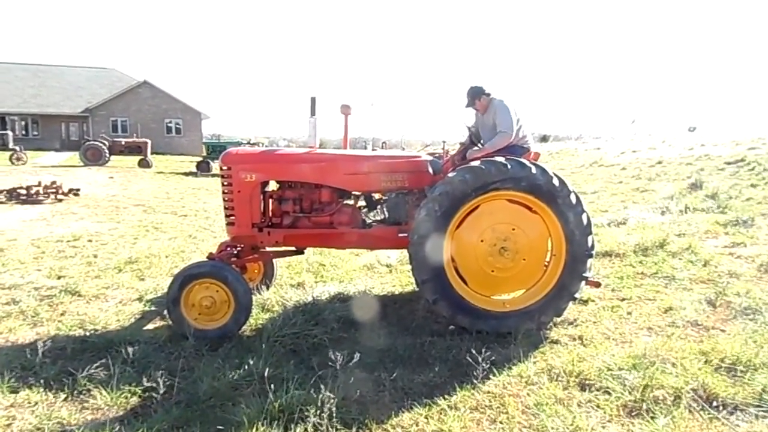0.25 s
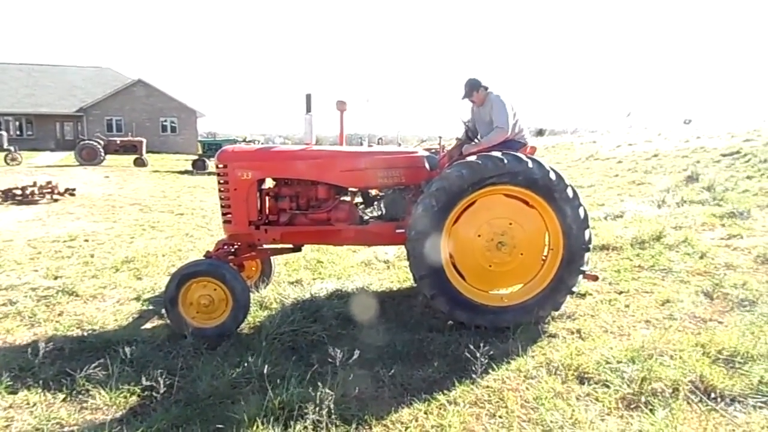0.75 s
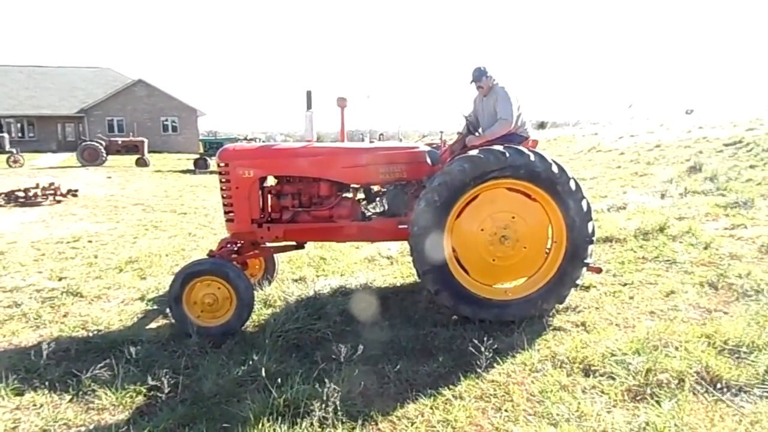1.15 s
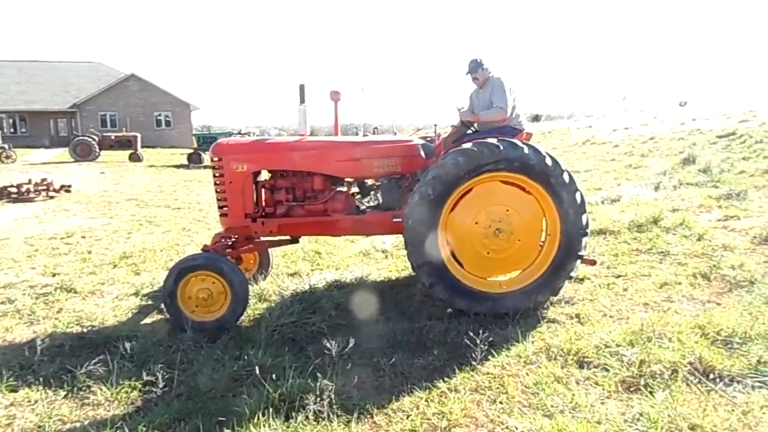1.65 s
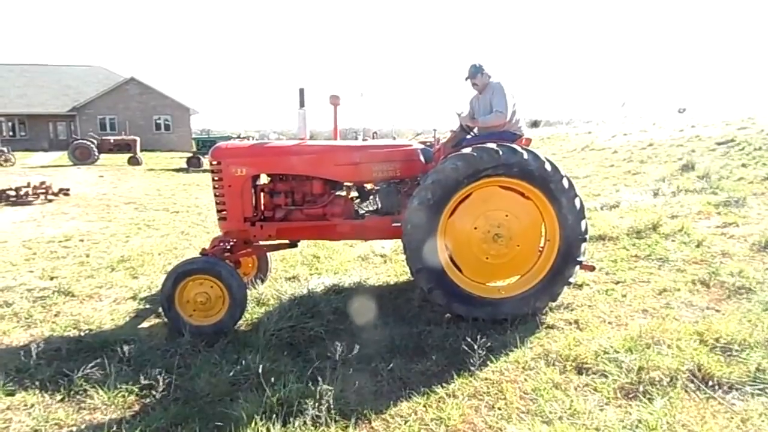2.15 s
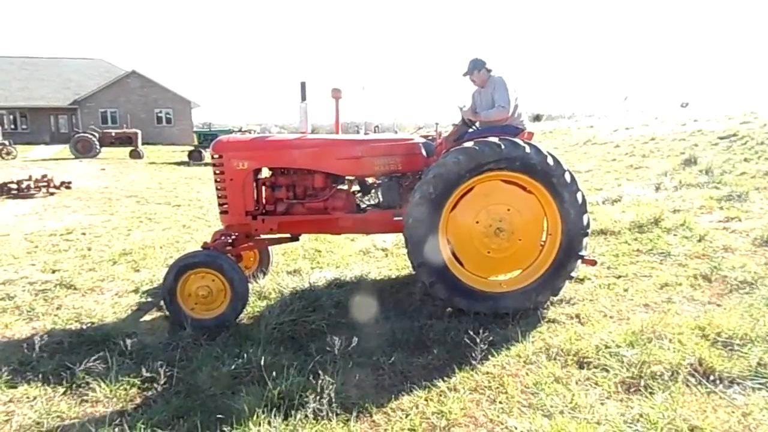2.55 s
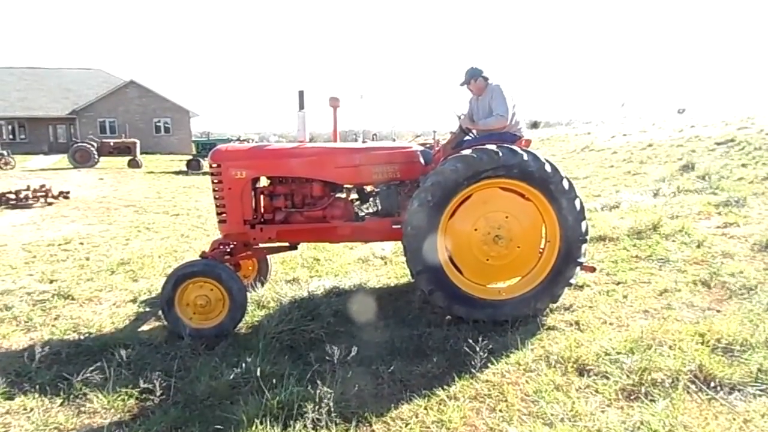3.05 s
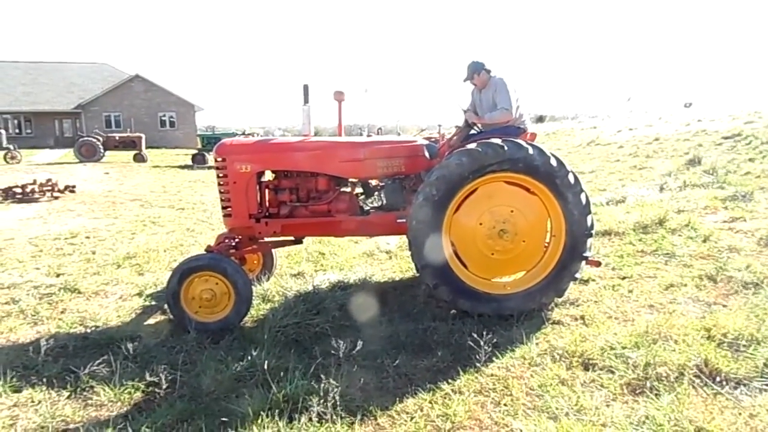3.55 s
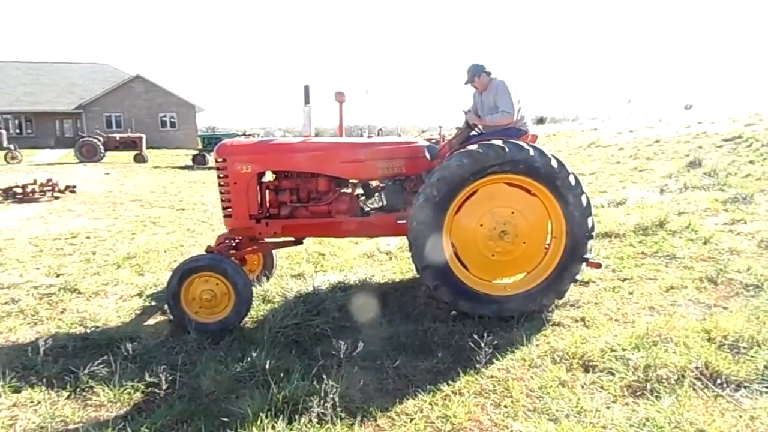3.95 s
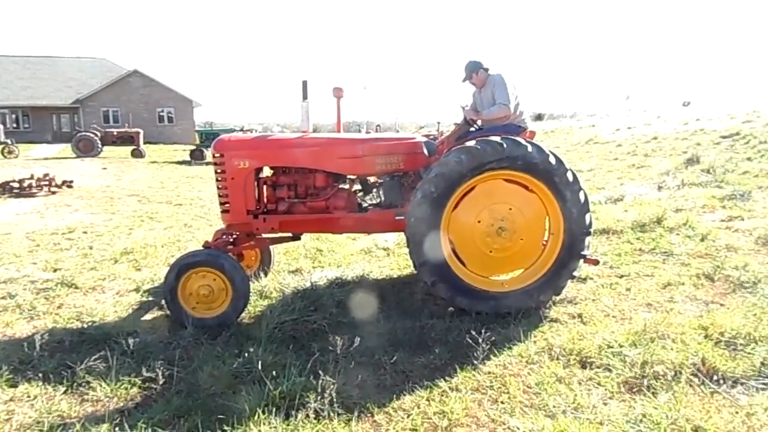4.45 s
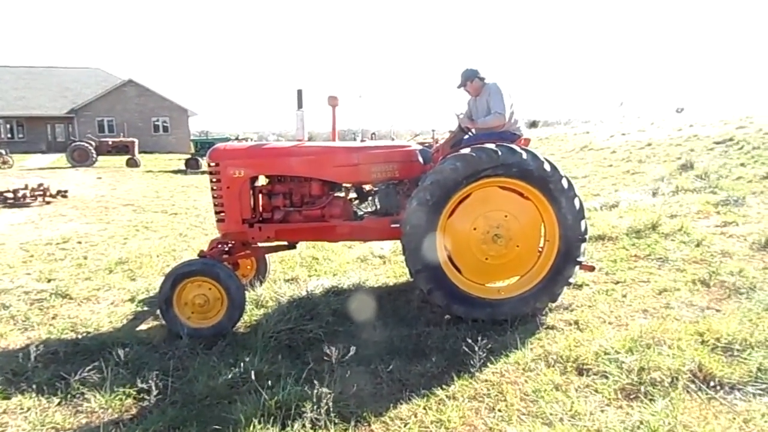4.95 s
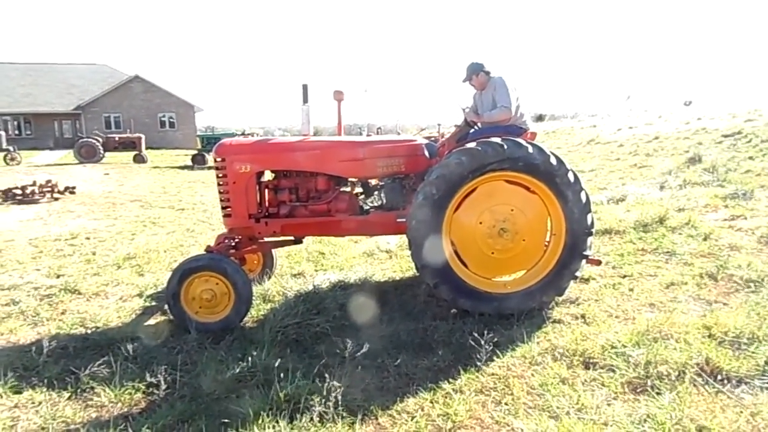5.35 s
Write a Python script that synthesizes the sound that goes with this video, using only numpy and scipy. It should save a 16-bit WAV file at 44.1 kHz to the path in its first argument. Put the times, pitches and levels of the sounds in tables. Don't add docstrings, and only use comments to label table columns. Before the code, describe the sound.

Steady rapid putter of an old tractor close by, hissy and clattery, repeatedly ducked under booming wind buffets and then swelling back.

```python
import sys
import numpy as np
from scipy import signal
from scipy.fft import rfft, irfft, next_fast_len
from scipy.io import wavfile
from scipy.ndimage import uniform_filter1d, map_coordinates

SR = 44100
rng = np.random.default_rng(int(sys.argv[2]) if len(sys.argv) > 2 else 0)


def wrap_up_sound(samples):
    columns = np.atleast_2d(samples).T
    tamed = np.clip(columns, -1, 1)
    steps = np.round(tamed * 32767).astype(np.int16)
    wavfile.write(sys.argv[1], SR, steps)


N = 247842
TIME = np.arange(N) / SR

# (time [s], lead over the steady count # [firings])
FIRING_LEAD = [
    (0, -.97),
    (1.775, -.47),
    (1.7755, .33),
    (3, .5),
    (4, .48),
    (4.5, .415),
    (5, .29),
    (5.62, .06),
]
# (valve delay [firings], thump [dB], jet [dB], jet fade by 60 dB [s], knock [dB])
CYLINDERS = [
    (-0.0029, 1, 2.5, 0.051, 5.5),
    (0.0406, 1.5, -6, 0.018, 5),
    (0.0037, -2.5, 2.6, 0.029, -2.5),
    (-0.0178, -9.5, 1, 0.07, -7),
]
# (pitch [Hz], width [Hz], level [dB])
PIPE_MODES = [(67.9, 10.6, 1), (136.5, 12, -14), (173, 17.3, -11), (205, 22, -11.5), (250, 20, -25)]
# (frequency [Hz], level per Hz [dB])
JET_COLOUR = [(1760, -59), (3000, -4.5), (3660, 3.5), (3980, -10), (4180, -0.5), (4540, -2), (4790, 1),
              (5210, -2), (6060, -2), (7510, -3.5), (9170, -12), (9890, -6), (12200, -7.5), (13900, -4.5),
              (15600, -20)]
# (pitch [Hz], width [Hz], level [dB])
PIPE_MOUTH = [(6180, 200, -7.5), (10800, 150, -9.5), (12200, 250, -2)]
# (pitch [Hz], width [Hz], level [dB])
SUMP = [(592.6, 61.6, 6), (654, 56, -4.5), (825, 67, -34)]
GEARCASE = [(1274, 160, -4.5), (1416, 61, -4), (1396.7, 32, -1), (1606, 54, -13.5)]
HOOD = [(2116, 260, -1.5), (2368, 160, 1), (2580, 63, 0), (3000, 160, -5)]
SUMP_RAP_DB = np.array([1, 4, -0.5, -21])
# (pitch at steady speed [Hz], level [dB])
WHINES = [(1417, -41), (1368, -44), (1334, -46), (675, -40), (484, -46), (904, -52)]
# (pitch [Hz], width [Hz], depth [dB])
GRASS_NULLS = [(1043, 215, -10), (1783, 137, -21)]
# (time [s], peak [dB], diaphragm pitch [Hz], gain left for the engine [dB])
BUFFETS = [(-.05, -28, 45, -16.5), (0.26, -17, 79, -16.5), (0.37, -33, 45, -16.5), (0.485, -8, 45.7, -14.5),
           (0.571, -14, 45, -14), (0.719, -20, 45, -12.5), (0.798, -9, 42, -27.5), (0.998, -26, 44.7, -18),
           (1.29, -9.5, 45, -13), (1.42, -31, 50, -11.5), (1.471, -13, 50, -22.5), (1.846, -6, 75, -16),
           (1.946, -5.5, 37.5, -23.5), (2.157, -24, 50, -19), (2.285, -15, 50.3, -20), (2.37, -33, 50, -18),
           (2.574, -4, 57.6, -20), (2.629, -26, 45, -22), (2.924, -8.5, 45, -14),
           (3.003, -9.5, 50.7, -18.5), (3.132, -24, 44, -18.5), (3.287, -10.5, 40, -21),
           (4.19, -9.5, 48, -9), (4.247, -7, 44.7, -12), (4.33, -29, 50, -17.5), (4.515, -23, 50, -9.5),
           (5.115, -28, 50, -6.5), (5.345, -4, 45, -19), (5.424, -22.5, 45, -22), (5.488, -15, 45, -27.5)]
# (start [s], length [s], rumble [dB], flutter [dB])
GUSTS = [(0.0, 0.21, -21, -27), (0.262, 0.0072, -16.5, -14), (0.315, 0.23, -18, -23.5),
         (0.69, 0.11, -16, -21), (0.92, .1, -24.5, -33.5), (1.149, 0.21, -25.5, -24.5),
         (1.418, 0.061, -19.5, -21.5), (1.6, 0.17, -23, -33.5), (1.805, 0.077, -19.5, -20),
         (1.925, .04, -15.5, -22.5), (2.059, 0.16, -17.5, -33.5), (2.256, 0.22, -21.5, -28),
         (2.534, 0.084, -14, -29), (2.707, .15, -18.5, -29), (2.974, 0.048, -14.5, -23),
         (3.097, 0.056, -17, -28), (3.213, 0.14, -16.5, -31), (3.591, 0.059, -21, -24.5),
         (3.801, 0.37, -24.5, -28.5), (4.141, 0.2, -17.5, -21.5), (4.459, 0.074, -24, -25),
         (4.78, 0.22, -24, -28.5), (5.077, 0.055, -30, -20), (5.288, 0.12, -18, -24),
         (5.404, 0.11, -17.5, -21)]
# (frequency [Hz], level per Hz [dB])
RUMBLE_COLOUR = [(8, 3), (18, -8), (30, -0.5), (55, -7.5), (90, -16.5), (150, -32), (300, -57)]
# (frequency [Hz], level per Hz [dB])
FLUTTER_COLOUR = [(40, -8), (80, 2), (160, -6), (300, -16.5), (550, -28.5), (1100, -43), (2000, -46.5)]
# (time [s], peak [dB])
POPS = [(0.05, -17.5), (0.255, -9), (0.271, -19), (0.352, -11.5), (0.364, -13.5), (0.424, -13.5),
        (0.722, -20), (0.761, -15), (0.776, -14.5), (1.318, -15), (1.423, -9.5), (1.464, -7.5),
        (1.55, -23.5), (1.874, -22), (2.164, -17), (2.281, -14.5), (2.302, -11.5), (2.428, -20),
        (2.923, -19), (3.286, -17), (4.193, -17.5), (4.211, -19), (4.238, -15.5), (4.285, -15.5),
        (4.332, -12), (4.486, -17), (4.517, -13), (5.358, -11), (5.416, -26), (5.491, -16)]
# (time [s], peak [dB], pitch [Hz])
CRACKS = [(0.116, -24, 622), (0.206, -21, 608), (1.795, -32, 644), (1.833, -25, 565), (2.977, -38, 600),
          (3.021, -23, 620), (3.229, -21.5, 576), (4.298, -20.5, 584), (5.098, -19.5, 390),
          (5.498, -29, 640)]

FIRINGS_PER_S = 33.6
FIRING_COUNT = FIRINGS_PER_S * TIME + np.interp(TIME, *np.transpose(FIRING_LEAD))
TAPPET_LEAD_S, TAPPET_DB = 0.00354, -39
DRONE_DB, DRONE_LAG_FIRINGS = -36, 0.06
DUCK_LAG_S = 0.0042
RISE_DB_PER_S, FALL_DB_PER_S = 266, 292
LULL_RUMBLE_DB, LULL_FLUTTER_DB = -27, -38
EDDY_HZ, EDDY_SPREAD = 292, 0.17
SHED_PER_S, SHED_DB, SHED_SCATTER_DB = 28, 0, 5
STROKE = 0.41
TOP_HZ = 15720


def amp(db):
    return 10 ** (np.asarray(db) / 20)


def unit(x):
    return x / np.sqrt(np.mean(x ** 2) + 1e-20)


def wobble(rate):
    points = rng.standard_normal(int(N * rate / SR) + 4)
    return map_coordinates(points, [TIME * rate])


def filtered(x, response):
    size = next_fast_len(N + SR // 2)
    hz = np.fft.rfftfreq(size, 1 / SR)
    return irfft(rfft(x, size) * response(hz), size)[:N]


def coloured(x, spectrum):
    points_hz, points_db = np.transpose(spectrum)

    def response(hz):
        return amp(np.interp(np.log(hz + 1), np.log(points_hz), points_db, -120, -120))

    return unit(filtered(x, response))


def resonant(x, modes):
    def response(f):
        return sum(amp(db) * 1j * f * width / (centre * centre - f * f + 1j * f * width)
                   for centre, width, db in modes)

    return filtered(x, response)


def since(times):
    last = np.clip(np.searchsorted(times, TIME) - 1, 0, None)
    return last, np.abs(TIME - times[last])


def cyclic(share):
    steps = int(4 * SR / FIRINGS_PER_S)
    place_in_cycle = (FIRING_COUNT / 4 % 1 * steps).astype(int)
    same = rng.standard_normal(steps)[place_in_cycle]
    share = np.clip(share, 0, 1)
    return np.sqrt(share) * same + np.sqrt(1 - share) * rng.standard_normal(N)


def patchy(depth_db):
    grid = signal.stft(rng.standard_normal(N), nperseg=256)[2]
    patches = uniform_filter1d(rng.standard_normal(grid.shape), size=4, axis=0)
    patches = uniform_filter1d(patches, size=8, axis=1)
    return signal.istft(grid * amp(depth_db * unit(patches)), nperseg=256)[1][:N]


def valves(jitter):
    firing = np.arange(-2, int(FIRING_COUNT[-1]))
    rows = np.array(CYLINDERS)[firing % 4]
    phase = firing + 0.695 + rows[:, 0] + jitter * rng.standard_normal(len(firing))
    return np.interp(phase, FIRING_COUNT, TIME, left=-0.01), rows


def thump(opens, rows, scatter_db):
    pulses = np.zeros(N + SR)
    size = amp(rows[:, 1] + scatter_db * rng.standard_normal(len(opens)))
    pulses[np.round((opens + 0.004) * SR).astype(int).clip(0)] = -size
    soft = filtered(pulses[:N], lambda f: 1 / (1 + 1j * f / 350) ** 2)
    return unit(resonant(soft, PIPE_MODES))


def puffs(opens, rows, scatter_db):
    last, t = since(opens)
    size_db = scatter_db * rng.standard_normal(len(opens))
    spit = amp(size_db)[last] * (1 - np.exp(-t / 0.0006)) * amp(-60 * t / 0.07)
    late = np.clip(t - 0.006, 0, None)
    rush_size = amp(size_db + rows[:, 2])[last]
    rush = rush_size * (1 - np.exp(-late / 0.0022)) * amp(-60 * late / rows[last, 3])
    return spit, rush


def exhaust_jet(spit, rush):
    grit = amp(0.6 * wobble(400))
    bright = filtered(spit * patchy(depth_db=2.5), lambda f: 1j * f / (7000 + 1j * f))
    dull = filtered(rush * grit * patchy(depth_db=4.5), lambda f: 9000 / (9000 + 1j * f))
    steady_leak = 0.01 * rng.standard_normal(N)
    return coloured(2.0 * bright + 2.66 * dull + steady_leak, JET_COLOUR)


def hum(modes, flow, steady, uneven_db):
    shake = (flow + steady) * amp(uneven_db * wobble(45))
    return unit(resonant(shake * cyclic(share=0.37), modes))


def block_hum(flow):
    sump = amp(-30.5) * hum(SUMP, flow, steady=0.74, uneven_db=3.5)
    gearcase = amp(-35.0) * hum(GEARCASE, flow, steady=3.4, uneven_db=2.0)
    hood = amp(-36.0) * hum(HOOD, flow, steady=1.0, uneven_db=3.0)
    return sump + gearcase + hood


def knocks(opens, lag_s, rap_s, size_db, modes):
    chance = rng.standard_normal((len(opens), 2))
    last, t = since(opens + lag_s + 0.00093 * chance[:, 0])
    size = amp(size_db + 1.7 * chance[:, 1])[last]
    blow = size * (1 - np.exp(-t / 0.00035)) * np.exp(-t / rap_s)
    return unit(resonant(blow * cyclic(share=0.5), modes))


def pings(opens, size_db):
    chance = rng.standard_normal((len(opens), 3))
    last, t = since(opens + 0.008 + 0.00137 * chance[:, 0])
    mode = np.round(np.clip(0.83 * chance[:, 1] + 0.19, -1, 3))
    hz = (2370 + 330 * mode + 50 * chance[:, 0])[last]
    size = amp(size_db + 1.6 * chance[:, 2])[last]
    fade = (1 - np.exp(-t / 0.001)) * amp(-60 * t / 0.033)
    return unit(size * fade * np.sin(2 * np.pi * hz * t))


def block_raps(opens, rows):
    sump_db = np.resize(np.roll(SUMP_RAP_DB, shift=2), len(opens))
    sump = knocks(opens, lag_s=0.00513, rap_s=0.0042, size_db=sump_db, modes=SUMP)
    hood = knocks(opens, lag_s=0.00664, rap_s=0.0059, size_db=rows[:, 4], modes=HOOD[:3])
    tappet = knocks(opens[2::4], lag_s=-TAPPET_LEAD_S, rap_s=0.0031, size_db=0, modes=SUMP)
    panel = pings(opens, size_db=rows[:, 4])
    return amp(-31.5) * sump + amp(-41.5) * hood + amp(TAPPET_DB) * tappet + amp(-39.0) * panel


def tones(waver):
    whine = np.zeros(N)
    for hz, db in WHINES:
        level = amp(db + 1.5 + 2.5 * wobble(12))
        turn = 2 * np.pi * hz / FIRINGS_PER_S * FIRING_COUNT
        whine += level * np.sin(turn + waver * wobble(14))
    drone_level = amp(DRONE_DB + 2.5 + 1.5 * wobble(13))
    drone_turn = 4 * np.pi * (FIRING_COUNT - DRONE_LAG_FIRINGS)
    return whine + drone_level * np.cos(drone_turn + 0.5 * wobble(20))


def over_grass(x):
    def dip(f, centre, width, db):
        off_centre = centre * centre - f * f
        return (off_centre + 1j * f * width * amp(db)) / (off_centre + 1j * f * width)

    return filtered(x, lambda f: np.prod([dip(f, *null) for null in GRASS_NULLS], axis=0))


def engine():
    opens, rows = valves(jitter=0.011)
    spit, rush = puffs(opens, rows, scatter_db=0.9)
    flow = np.hypot(spit, 0.32 * rush)
    jet = exhaust_jet(spit, rush)
    hiss = amp(-37.5) * (jet + resonant(jet, PIPE_MOUTH))
    outdoors = over_grass(hiss + block_hum(flow) + block_raps(opens, rows))
    return amp(-18) * thump(opens, rows, scatter_db=0.5) + tones(waver=0.89) + outdoors


def gain_control(release_s, grip_s):
    start, _, _, left_db = np.transpose(BUFFETS)
    last, t = since(start + DUCK_LAG_S)
    gain_db = left_db[last] * np.exp(-t / release_s)
    return amp(uniform_filter1d(gain_db, int(grip_s * SR)))


def gusts():
    level_db = np.array([[LULL_RUMBLE_DB], [LULL_FLUTTER_DB]]) * np.ones(N)
    for start, length, *peak_db in GUSTS:
        before = RISE_DB_PER_S * (start - TIME)
        after = FALL_DB_PER_S * (TIME - start - length)
        loss_db = np.maximum(before, after).clip(0)
        level_db = np.maximum(level_db, np.c_[peak_db] - loss_db)
    return level_db


def even(x, span_s):
    power = np.abs(uniform_filter1d(x ** 2, int(span_s * SR)))
    return unit(x / np.sqrt(power + 0.059))


def eddies(flutter_db):
    out = np.zeros(N + SR)
    t = np.arange(-0.02, 0.02, 1 / SR)
    luck = rng.random((int(SHED_PER_S * N / SR), 2))
    small = [(u * N / SR, flutter_db[int(u * N)] + SHED_DB + SHED_SCATTER_DB * (2 * v - 1))
             for u, v in luck]
    slaps = list(POPS) + small
    pitch_hz = EDDY_HZ * np.exp(EDDY_SPREAD * rng.standard_normal(len(slaps)))
    bursts = [(*row, hz) for row, hz in zip(slaps, pitch_hz)] + list(CRACKS)
    for (at, db, hz), chance in zip(bursts, rng.random((len(bursts), 5))):
        # lag in s, times the pitch, level in dB, starting turn
        parts = [(0, 0.9, 1, chance[0]),
                 (-0.004 * chance[1], 1.7, -6, chance[2]),
                 (0.0051 * chance[3], 3.1, -12, chance[4])]
        for lag, quick, part_db, turn in parts:
            cycle = quick * hz * (t - lag)
            wave = np.exp(-(cycle / 0.5) ** 2) * np.cos(2 * np.pi * (cycle + turn))
            out[round(at * SR):][:len(t)] += amp(db + part_db) * wave
    return out[round(0.02 * SR):][:N]


def slams():
    out = np.zeros(N)
    for (at, db, hz, _), turn in zip(BUFFETS, rng.random(len(BUFFETS))):
        cycle = hz * (TIME - at)
        out += amp(db) * np.exp(-(cycle / 0.54) ** 2) * np.cos(2 * np.pi * (cycle + turn))
    return out


def wind():
    rumble_db, flutter_db = gusts()
    rumble = even(coloured(rng.standard_normal(N), RUMBLE_COLOUR), span_s=0.0794)
    lumpy = amp(5.4 * wobble(40)) * rng.standard_normal(N)
    flutter = even(coloured(lumpy, FLUTTER_COLOUR), span_s=0.072)
    push = amp(rumble_db) * rumble + amp(flutter_db) * flutter + eddies(flutter_db) + slams()
    return push / (1 + np.abs(push / STROKE) ** 4) ** (1 / 4)


def scene():
    gain = gain_control(release_s=0.41, grip_s=0.022)
    return (gain * engine() + wind())[None]


def record(dry):
    clipped = dry[0] / (1 + np.abs(dry[0] / 0.445) ** 8) ** (1 / 8)
    return filtered(clipped, lambda hz: amp(-0.2 * np.clip(hz - TOP_HZ, 0, 400)))[None]


dry = scene()
out = record(dry)
wrap_up_sound(out)
```